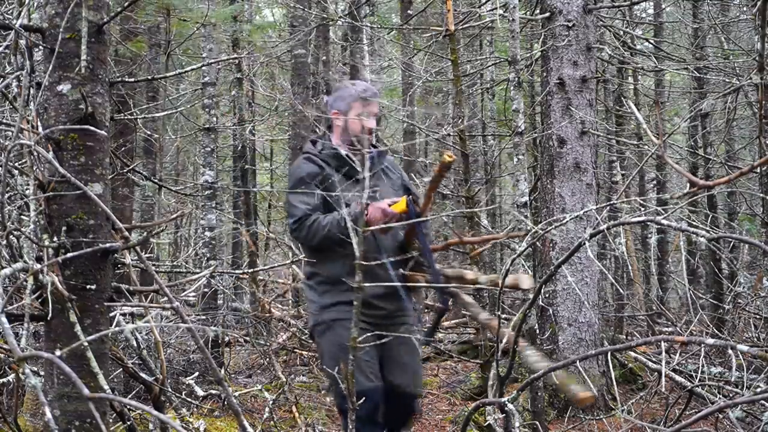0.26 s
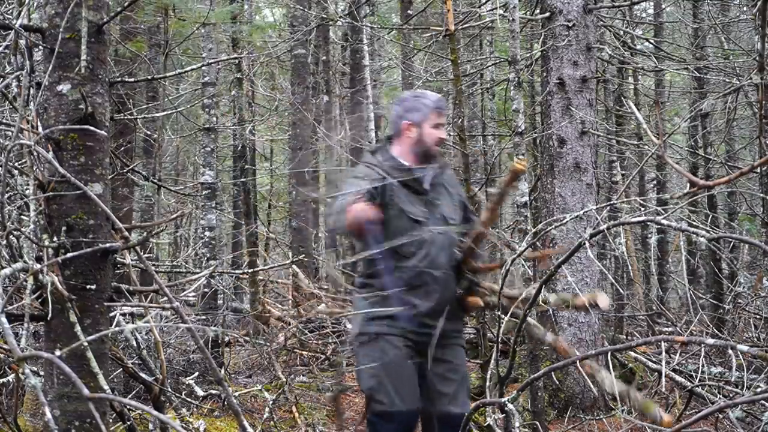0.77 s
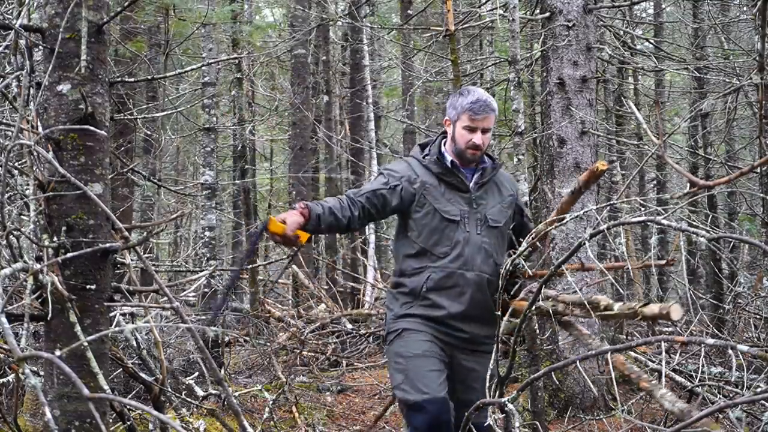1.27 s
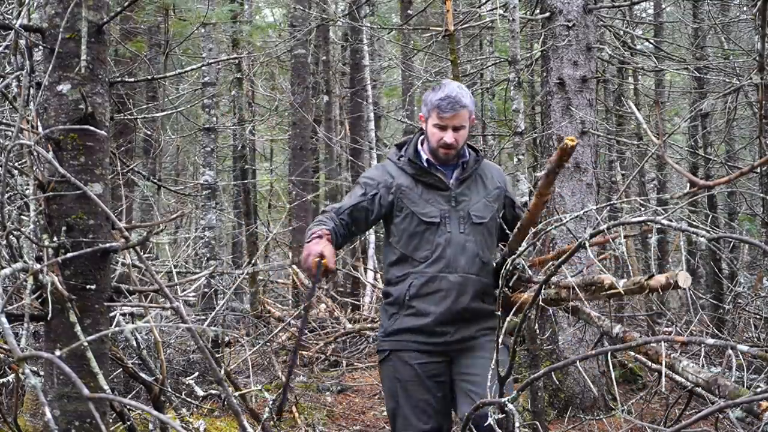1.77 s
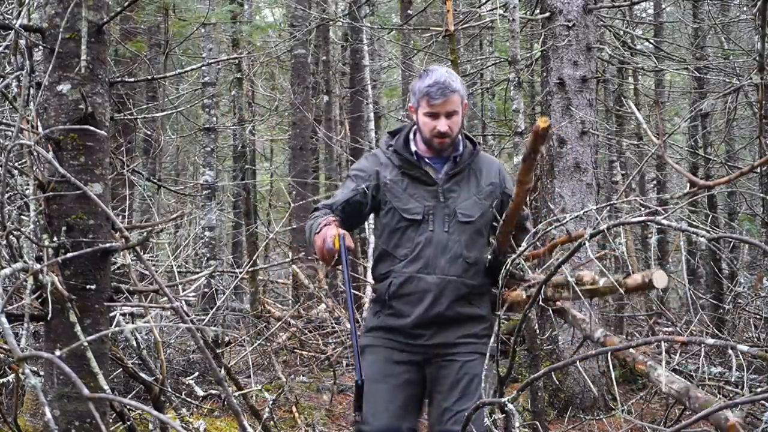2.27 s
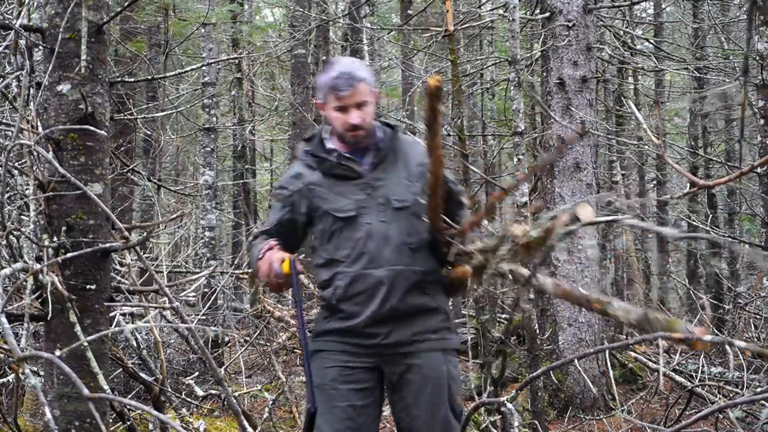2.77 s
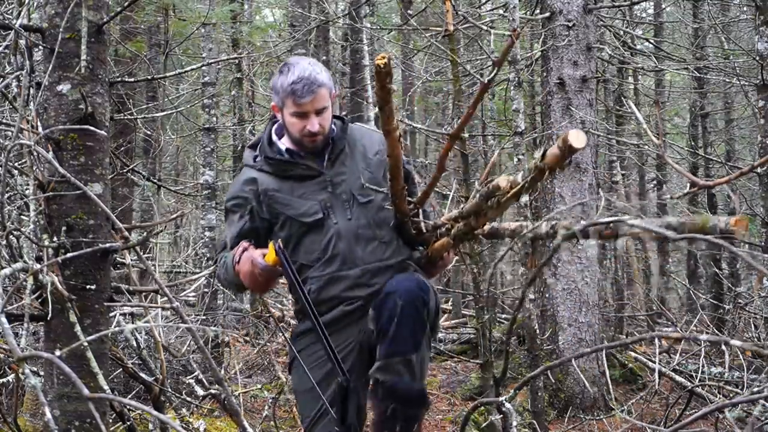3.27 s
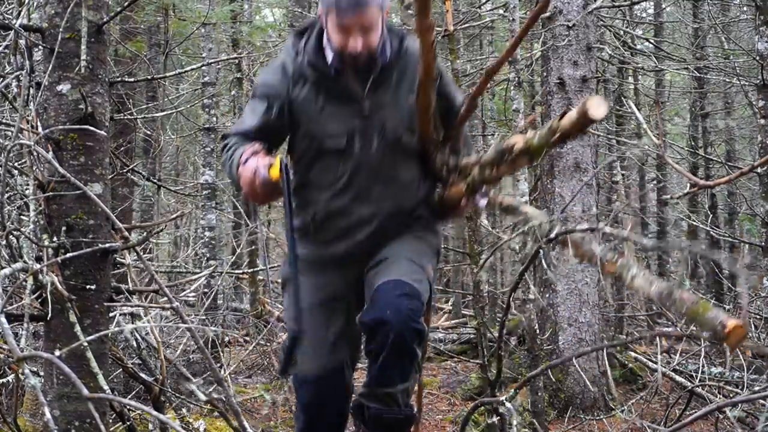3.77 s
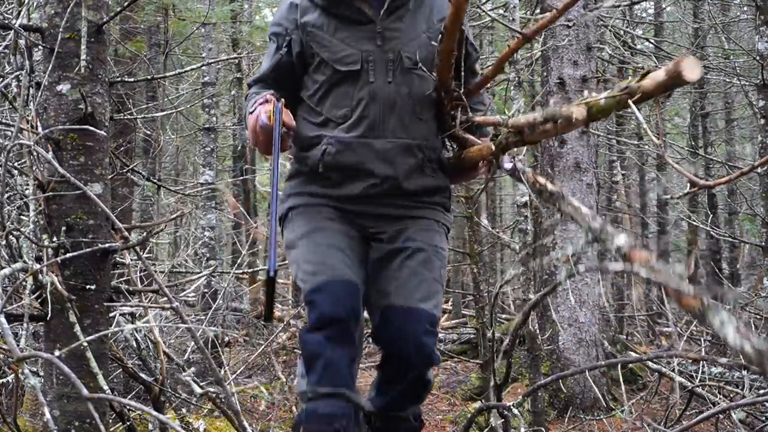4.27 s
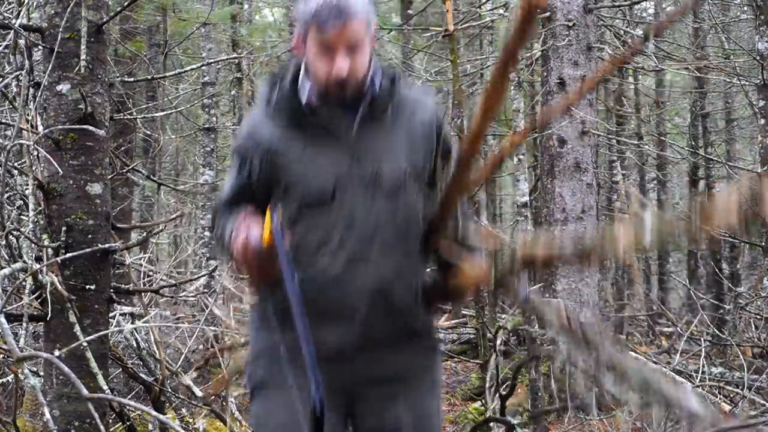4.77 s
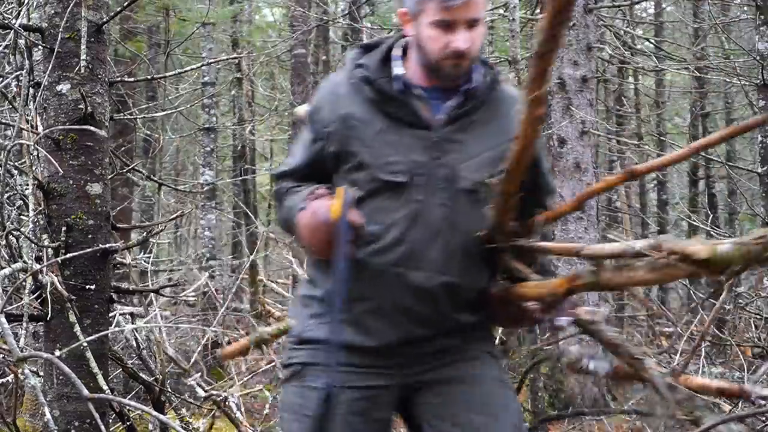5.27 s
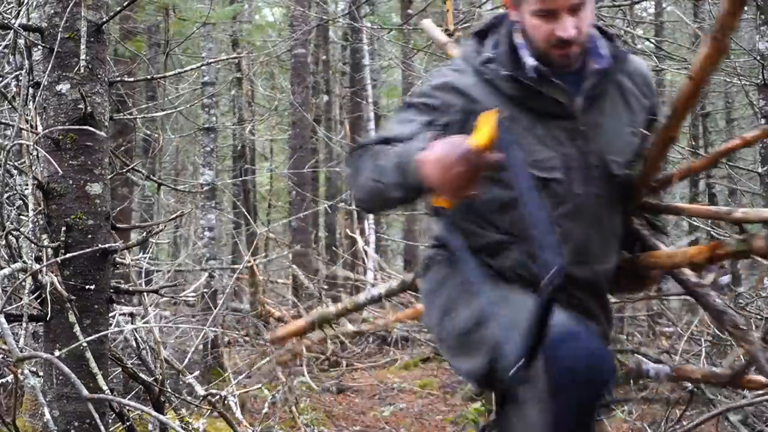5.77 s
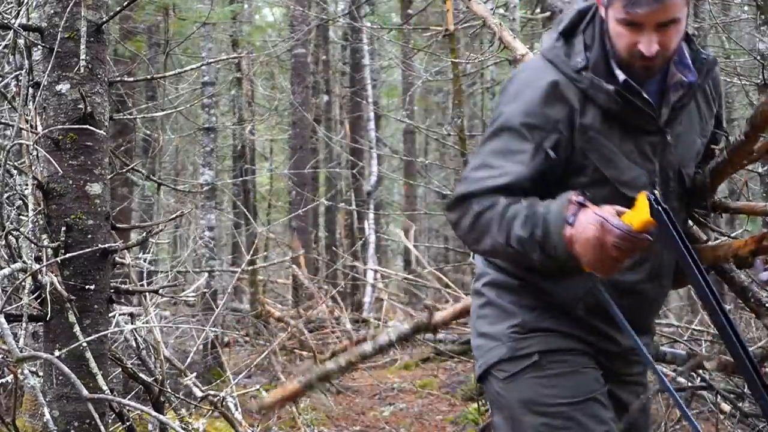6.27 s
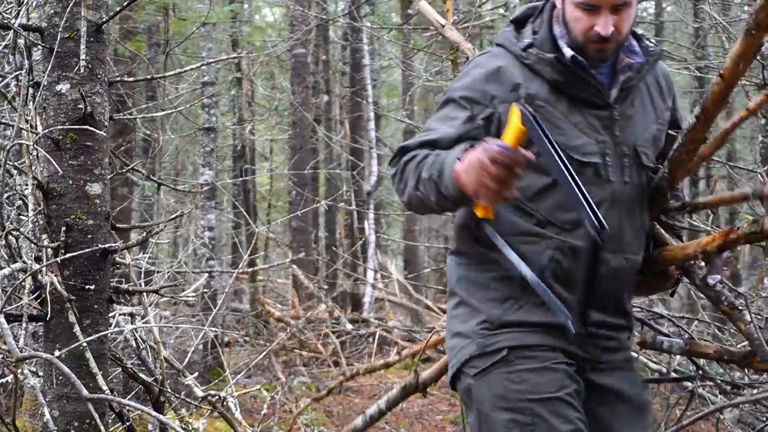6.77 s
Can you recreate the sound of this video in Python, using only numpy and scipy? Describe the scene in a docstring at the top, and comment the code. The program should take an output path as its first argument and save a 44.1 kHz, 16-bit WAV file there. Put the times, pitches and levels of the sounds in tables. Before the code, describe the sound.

Light twig snaps, soft steps and a few thin metallic taps and scrapes from a hand saw come from a little way off in quiet woods. After a swish of cloth and a brief wooden squeak, the walker is near the microphone. Brittle branches crack loudly and often, boots and carried poles knock dully in the ground litter, and twigs drag over clothes, with a short echo off the trunks.

```python
"""A man pushes through dead spruce thicket towards the microphone with branches and a bow saw.
At first dry twigs snap, and others tap and scrape the saw so that its steel modes ring.
Near 3 s his jacket swishes by friction; at 4 s wood rubs on wood with one stick-slip squeak.
From then on he is close: twigs fracture loudly, boots and poles thud and crunch in the litter,
and boughs rasp across his clothes. Throughout, the trunks scatter every sound back."""
import sys
import numpy as np
from scipy import signal
from scipy.fft import rfft, irfft
from scipy.io import wavfile
from scipy.ndimage import uniform_filter1d

SR = 44100
rng = np.random.default_rng(int(sys.argv[2]) if len(sys.argv) > 2 else 0)


def waveform_to_disk(signal):
    """Save audio, clipped to [-1, 1], as 16-bit WAV at the path in sys.argv[1]."""
    frames = np.transpose(np.atleast_2d(signal))
    scaled = np.clip(frames, -1, 1) * 32767
    samples = np.round(scaled).astype(np.int16)
    wavfile.write(sys.argv[1], SR, samples)


N = 309582
TIME = np.arange(N) / SR

# twigs breaking: (time [s], strength [dB], tilt [dB/octave], resonance [Hz],
# resonance height [dB], splinter level [dB])
SNAPS = [(.017, -27.5, 1.5, 3540, 21.5, -2), (.168, -22, -6, 1120, 11, -6.5),
         (0.225, -28, -6, 1170, 15, -2), (0.299, -25.5, -7, 1140, 12.5, -17),
         (.4977, -20, -1, 2390, 11, -3), (0.5337, -22, 2.5, 1780, 11, -17),
         (0.5731, -10.5, 3.5, 4320, 6, -3), (.833, -13.5, -6, 2920, 15.5, 1.5),
         (0.8668, -13.5, -2, 3500, 14, -8), (0.9877, -16.5, -4, 12950, 10, -10),
         (1.074, -17.5, -1.9, 7820, 15, -5.5), (1.143, -8.5, 1.8, 3350, 4.5, -9.5),
         (2.3002, -5.5, 1.3, 3780, 4, -14.5), (2.657, -14.5, -3, 10900, 18.5, -28),
         (3.119, -24.5, 3, 8510, 10, -5), (3.15, -25, 4, 2290, 14, -2.5),
         (3.3608, 3, 0.8, 6000, 11.5, -9.5), (3.516, -2, 0.2, 2420, 15, -5),
         (3.5933, -18.5, 0, 7820, 13, -2.5), (4.162, -21.5, -2.5, 2950, 9.5, -15),
         (4.2333, -20.5, 1, 3970, 7, -17), (4.324, 10, 2.5, 1670, 11.5, -13.5),
         (4.3866, 5, 4, 1780, 13.5, -13), (4.4779, 2.5, 4, 1530, 13, -16), (4.5561, -4, 4.5, 6600, 3.5, -9),
         (4.5859, -7, 1, 3980, 17.5, -30), (4.6081, 3, 1.5, 3700, 18, -11),
         (4.6391, -4.5, 8, 13000, -6, -8), (4.6479, 2, 2, 3790, 20.5, -15), (4.6524, 3, 5, 6850, 12.5, -13),
         (4.75, 0, -2.5, 3540, 5.5, -9), (4.769, -0.5, 4.5, 11400, 8.5, -5.5),
         (4.813, -1.5, -2, 1700, 5, -11), (4.8473, -0.5, 1.5, 8800, 17, -15),
         (4.8507, 3.5, -1, 2120, 12.5, -9.5), (4.893, -8.5, -1.5, 2040, 22, -3.5),
         (4.9527, -9.5, -0.5, 900, 4, -7), (5.0775, -1, 3, 3100, 18, -23), (5.1958, -4.5, 0.5, 870, 6, -12),
         (5.3479, 1, -3, 940, 7.5, -11.5), (5.3868, 0, -0.5, 5850, 5, -9.5),
         (5.4022, -8, -3.5, 6070, 9, -2.5), (5.4433, -14, -7.5, 1100, 12.5, -18),
         (5.4789, -6, -0.7, 12600, 11, -12), (5.6091, -6.5, 0.2, 13000, 4, -19),
         (5.6379, -4, -2.5, 1030, 14.5, -13), (5.669, -8.5, -2.5, 1850, 6, -4),
         (5.769, -18.5, -1, 11940, 11, -2.5), (5.8323, -3.5, -0.5, 5570, 1, -17),
         (5.8602, -8.5, 2, 1020, 6, -24), (6.039, -6.5, -3, 875, 15, -3), (6.0651, -2, 0.4, 1270, 3, -10.5),
         (6.092, -17, 4, 9000, 2, -21), (6.1211, -6, 6, 6940, 3.5, -18),
         (6.1802, -10.5, -1.5, 2570, 10.5, -16), (6.2185, -11, -3, 9800, 17.5, -11),
         (6.2717, -15.5, -6, 1030, 13, 0.5), (6.358, -14.5, 2.2, 880, 6, -10),
         (6.395, -14, 1, 700, 11, -15), (6.454, -17.5, 4, 4000, -2, -12),
         (6.5466, -8.5, -4.5, 2030, 9.5, -15), (6.604, -17, 1, 4500, 4.5, -12),
         (6.7021, -5, 4, 5300, 5.5, -12.5), (6.7347, -12.5, 4, 4910, 5.5, -12),
         (6.8036, 0.5, 3, 11200, 6, -7), (6.8093, 9.5, -2, 8800, 13, -14.5),
         (6.8283, -3, 4.5, 12000, 8, -5.5)]
# spectrum common to all breaks: (frequency [Hz], gain [dB])
SNAP_SPECTRUM = [(30, -17), (120, -4.5), (350, 0.5), (800, 0), (3500, 1.5), (6000, -0.5), (9000, 0.5),
                 (12000, -6.5), (16000, -10)]
# further shaping of the splinters: (frequency [Hz], gain [dB])
SPLINTER_SPECTRUM = [(300, -12), (1500, 11), (4000, 6.5), (8000, 8), (15000, -2.5)]
# dull knocks of boots and poles: (time [s], level [dB], pitch [Hz])
THUDS = [(0.0344, -38, 444), (0.0959, -36, 393), (.766, -31, 400), (0.8046, -35, 425), (.841, -39, 670),
         (1.0225, -34, 440), (1.1932, -37, 252), (1.3204, -28, 383), (1.487, -41, 164), (1.523, -35.5, 270),
         (1.9969, -40, 342), (2.0685, -36.5, 168), (2.303, -35, 340), (2.384, -37, 555),
         (2.6083, -33.5, 152), (3.3597, -35.5, 244), (3.669, -39, 730), (3.9903, -35, 560),
         (4.3255, -27.5, 272), (4.385, -23.5, 378), (4.479, -28, 370), (4.5357, -32.5, 243),
         (4.66, -22, 398), (4.679, -23, 390), (4.739, -23.5, 342), (4.796, -22.5, 195), (4.809, -17.5, 452),
         (5.209, -35, 358), (5.283, -26, 290), (5.3131, -16.5, 440), (5.3585, -18, 314),
         (5.3925, -15.5, 320), (5.5945, -23, 376), (5.6392, -18.5, 456), (5.701, -32, 290),
         (5.8928, -19.5, 363), (5.9277, -23.5, 114), (6.2007, -16.5, 265), (6.404, -36.5, 380),
         (6.518, -29, 310), (6.785, -21, 446), (6.8096, -17, 476), (6.8342, -24, 450), (6.8561, -23.5, 500)]
# crushed needle litter: (frequency [Hz], gain [dB])
LITTER_SPECTRUM = [(25, -16), (70, -4.5), (150, -5), (380, 1), (650, -3), (1100, -6), (2000, -14),
                   (5000, -22.5)]
# boughs dragging across clothes and springing free:
# (peak time [s], rasp level [dB], crackle level [dB], rise [s], fall [s])
BOUGHS = [(.01, -51, -59, 0.038, 0.9), (.61, -43, -49, 0.29, 0.33), (.845, -35, -47, .05, 0.067),
          (1.15, -50.5, -59.5, 0.86, 0.1), (1.27, -49, -53, 0.059, 0.1), (1.54, -55.5, -61.5, 0.36, 0.22),
          (1.85, -47, -56, 0.043, 0.05), (2.0, -56, -62, 0.2, 0.033), (2.09, -57.5, -58.5, 0.035, 0.3),
          (2.67, -59, -56, 0.079, 0.14), (3.57, -51.5, -51.5, 0.43, 0.35), (4.091, -47, -49.5, 0.15, 0.079),
          (4.55, -54, -58, 0.68, 0.12), (4.658, -51, -17, 0.017, 0.07), (4.8, -34.5, -34, 0.17, 0.22),
          (5.21, -59, -40.5, 0.049, 0.75), (5.41, -39, -59, 0.39, 0.053), (5.95, -39, -43.5, 0.14, 0.032),
          (6.06, -43, -42, 0.019, 0.099), (6.21, -43.5, -47, 0.19, 0.25), (6.45, -75, -52.5, 0.3, 0.45),
          (6.83, -41.5, -38, .09, 0.085)]
# stirring of the undergrowth, louder as the walker nears: (time [s], level [dB])
STIR = [(0, -63), (.9, -58.5), (1.5, -67), (1.85, -57.5), (2.15, -62.5), (2.55, -66.5), (2.8, -58.5),
        (3.3, -63.5), (3.7, -54), (3.9, -62), (4.28, -64), (4.7, -39.5), (5.1, -45.5), (5.7, -45),
        (6.0, -53.5), (6.35, -52.5), (6.65, -56.5), (7.02, -56.5)]
# coarse rasp of boughs: (frequency [Hz], gain [dB])
RASP_SPECTRUM = [(200, -38), (700, -0.5), (1300, 1), (2000, 1.5), (3600, 0), (5500, -6.5), (12000, -50)]
# fine crackle of twigs: (frequency [Hz], gain [dB])
CRACKLE_SPECTRUM = [(1000, 1), (3500, -5.5), (5500, -0.5), (8200, 7), (10500, -3), (14000, 1), (16000, -6)]
# twigs chattering on the saw: (time [s], level [dB])
SAW_TAPS = [(0.379, -43), (0.4, -36), (0.421, -48), (.629, -29), (0.693, -37.5), (1.19, -48), (1.913, -42)]
# twigs sliding along the saw: (peak time [s], level [dB], rise [s], fall [s])
SAW_SCRAPES = [(.62, -43, .19, 0.057), (1.15, -49.5, 0.23, 0.14), (1.48, -54.5, 0.057, .15),
               (1.69, -50, .09, .22), (1.91, -41.5, 0.25, 0.18)]
# normal modes of the saw: (frequency [Hz], level [dB], 60 dB decay time [s])
SAW_MODES = [(1906, -1, 0.32), (1948, -2, 0.091), (2150, -13.5, 0.54), (2384, -9, 0.16), (2550, -10, 0.1),
             (2980, -11, 0.046), (4215, 1.5, 0.0047)]
# wood rubbing on wood: (time [s], pitch [Hz], level [dB])
SQUEAK = [(4.057, 2325, -65), (4.063, 2160, -28), (4.066, 2285, -43), (4.07, 2260, -24.5),
          (4.077, 2070, -28), (4.077, 2080, -44), (4.101, 2120, -42)]
# jacket cloth sliding as a knee is lifted: (time [s], level [dB])
SWISH = [(2.9, -72), (3.05, -57), (3.14, -51), (3.25, -55.5), (3.35, -57.5), (3.62, -58), (3.9, -69)]
# hiss of sliding cloth: (frequency [Hz], gain [dB])
CLOTH_SPECTRUM = [(700, -22), (1800, -0.5), (4000, -3), (6000, -5), (8000, 1.5), (11000, -8), (16000, -15)]
# reverberation of the farther trunks: (frequency [Hz], 60 dB decay time [s])
WOODS_T60 = [(150, 0.46), (600, 0.093), (2000, 0.29), (5000, 0.61), (8000, 0.23), (15000, 0.68)]
# spectral weighting of the scattered sound: (frequency [Hz], gain [dB])
WOODS_SPECTRUM = [(100, 8), (500, 13), (1500, 3), (4000, 0), (8000, 5), (15000, -3.5)]
# still forest air: (frequency [Hz], gain [dB])
AIR_SPECTRUM = [(20, 3), (80, -2.5), (150, -8), (250, -9), (500, -10), (1000, -8.5), (2500, -22.5),
                (5500, -24), (8000, -39), (12000, -29), (16000, -44)]


def snaps(splinter_s=0.006, twiglet_db=-13, twiglet_s=0.033, overtone=0.093, knee_hz=700, size=8192):
    """Brittle fracture: tearing fibres excite the twig's bending modes; splinters and twiglets follow."""
    out, hz = np.zeros(N), np.fft.rfftfreq(size, 1 / SR) + 1
    lead_s = size // 16 / SR
    t = np.maximum(np.arange(size) / SR - lead_s, 0)
    settling = (t > .001) * (np.exp(-t / splinter_s) + amp(twiglet_db) * np.exp(-t / twiglet_s))
    for s, db, tilt, ring_hz, ring_db, splinter_db in SNAPS:
        fibres, splinters = rng.standard_normal((2, size))
        age = 2.8 * t / fracture_time(db, splinter_db)
        burst = rfft(fibres * age * np.exp(1 - age))
        burst /= np.sqrt(uniform_filter1d(abs(burst) ** 2, size // 32))  # a break is broadband
        # the second bending mode of a free stick lies 2.76 times above the first
        bending = resonance(hz, ring_hz) + overtone * resonance(hz, 2.76 * ring_hz)
        debris = rfft(unit(splinters * np.sqrt(abs(splinters)) * settling)) / np.sqrt(size)
        debris *= amp(splinter_db + curve(SPLINTER_SPECTRUM, hz))
        crack = burst * minimum_phase(ring_db * bending) + debris
        shape_db = curve(SNAP_SPECTRUM, hz) + tilt * np.log2(np.maximum(hz, knee_hz) / 3000)
        add(out, s - lead_s, irfft(crack * minimum_phase(db + shape_db)))
    return out


def fracture_time(db, splinter_db, base_s=0.0035, force_halving_db=17, splinter_doubling_db=11):
    """Crack growth: a strong, clean break is over at once; a weak or splintery one tears for longer."""
    return base_s * 2 ** (splinter_db / splinter_doubling_db - db / force_halving_db)


def resonance(hz, centre_hz, octaves=0.35):
    """Strong damping broadens a resonance, here into a bell shape over log frequency."""
    return np.exp(-.5 * (np.log2(hz / centre_hz) / octaves) ** 2)


def thuds(cycles=0.54, grit=0.24, crush_s=0.0068, low_cut_hz=89):
    """Damped impact: soft ground stops a knock within a few cycles; crushed litter roughens its tail."""
    out, t = np.zeros(N), np.arange(SR // 10) / SR
    for s, db, hz in THUDS:
        age = t * hz / cycles
        push = np.sqrt(age) * np.exp(1 - 1.11 * age) * np.sin(2 * np.pi * hz * t)
        crush = noise(LITTER_SPECTRUM, len(t)) * (1 - np.exp(-age)) * np.exp(-t / crush_s)
        add(out, s, amp(db) * (push + grit * crush))
    # the microphone's low cut takes the deepest bass out of the knocks
    return signal.sosfilt(signal.butter(2, low_cut_hz, "highpass", fs=SR, output="sos"), out)


def undergrowth(rasping, crackling, litter_db=-1, rasp_db=-1, crackle_db=-2):
    """Granular noise: litter crunches under the boots while twigs rasp and crackle past."""
    litter = grains(LITTER_SPECTRUM, per_s=800, spread_db=4.5, cycles=1, rub=0.19) * tread()
    rasp = grains(RASP_SPECTRUM, per_s=2800, spread_db=4.0, cycles=2.24, rub=0.71) * rasping
    crackle = grains(CRACKLE_SPECTRUM, per_s=2600, spread_db=4.5, cycles=0.6, rub=0.65) * crackling
    return amp(litter_db) * litter + amp(rasp_db) * rasp + amp(crackle_db) * crackle


def grains(spectrum, per_s, spread_db, cycles, rub, bands=28, clump_db=2.5):
    """Shot noise: tiny crushings of uneven size, each a few ragged cycles, add over a smooth rub."""
    crushings = np.zeros(N)
    clumps = amp(clump_db * unit(uniform_filter1d(rng.standard_normal(N), SR // 70)))
    for hz in np.geomspace(spectrum[1][0], min(spectrum[-2][0], 15000), bands):
        age = np.arange(int(8 * cycles / hz * SR) + 8) * hz / cycles / SR
        ragged = np.sin(2 * np.pi * cycles * age) + .4 * rng.standard_normal(len(age))
        grain = unit(age * np.exp(-age) * ragged) / np.sqrt(len(age))
        sizes = amp(spread_db * np.minimum(rng.exponential(1, N), 3))
        onsets = rng.random(N) < per_s / bands / SR
        crushings += signal.oaconvolve(sizes * onsets, grain)[:N] * np.sqrt(hz)
    return unit(clumps * (unit(colour(crushings, spectrum)) + rub * noise(spectrum)))


def tread(crunch_db=-19, lag_s=0.0073, rise_s=0.05, fall_s=0.073, stir_db=-1):
    """Loading of the litter: its gain peaks as the full weight follows each knock, over the shuffle."""
    crunches = swells((s + lag_s, db + crunch_db, rise_s, fall_s) for s, db, _ in THUDS)
    return np.hypot(crunches, amp(stir_db) * level(STIR))


def dragging(rasp_stir_db=-1, crackle_stir_db=-6):
    """Incoherent addition: boughs and stirred twigs sum in power to give the rasp and crackle gains."""
    rasp = swells((s, db, rise, fall) for s, db, _, rise, fall in BOUGHS)
    crackle = swells((s, db, rise, fall) for s, _, db, rise, fall in BOUGHS)
    stir = level(STIR)
    return np.hypot(rasp, amp(rasp_stir_db) * stir), np.hypot(crackle, amp(crackle_stir_db) * stir)


def ticks(crackling, per_s=45, tick_db=-7):
    """A short impulse is broadband: hair-thin twig ends flick off, each with one bare click."""
    click = irfft(minimum_phase(curve(CRACKLE_SPECTRUM, np.fft.rfftfreq(512, 1 / SR)) / 2))
    clicks = signal.oaconvolve(impulses(per_s), click)[:N]
    return amp(tick_db) * unit(clicks) * crackling


def saw(tap_db=-2, scrape_db=-2, chatter_s=0.003, contact_s=0.016):
    """Modal excitation: chattering taps and stick-slip scraping ring the same steel modes."""
    t, taps = np.arange(SR // 3) / SR, np.zeros(N)
    for s, db in SAW_TAPS:
        ring = steel(t, db_per_octave=0.5) * np.exp(-t / contact_s)  # the resting twig damps the steel
        chatter = rng.standard_normal(len(t)) * t * np.exp(-t / chatter_s)
        tap = signal.oaconvolve(chatter, ring)
        add(taps, s, amp(db + tap_db) * tap / tap[:SR // 50].std())
    scrape = signal.oaconvolve(impulses(per_s=700), steel(t, db_per_octave=-5))[:N]
    return taps + amp(scrape_db) * swells(SAW_SCRAPES) * unit(scrape)


def steel(t, db_per_octave):
    """Free vibration is a sum of decaying modes; a soft contact leaves the upper ones weaker."""
    ring, lowest_hz = np.zeros(len(t)), SAW_MODES[0][0]
    for hz, db, t60 in SAW_MODES:
        envelope = amp(db + db_per_octave * np.log2(hz / lowest_hz) - 60 * t / t60)
        ring += envelope * np.sin(2 * np.pi * (hz * t + rng.random()))
    return ring


def squeak(overtone_db=-25):
    """Stick-slip oscillation: wood on wood gives a short tone that wavers and falls."""
    s, hz, _ = np.transpose(SQUEAK)
    phase = 2 * np.pi * np.cumsum(np.interp(TIME, s, hz)) / SR
    return level(SQUEAK, column=2) * (np.sin(phase) + amp(overtone_db) * np.sin(2 * phase))


def jacket(reflection=0.26, delay_s=.0011):
    """Comb filtering: the hiss of sliding cloth interferes with its reflection from the ground."""
    hiss = noise(CLOTH_SPECTRUM)
    return level(SWISH) * unit(hiss + reflection * np.roll(hiss, round(delay_s * SR)))


def woods(direct, spots=5, spots_per_s=17):
    """Scattering depends on source position: the sound cycles through the echoes of several spots."""
    position, scattered = TIME * spots_per_s % spots, np.zeros(N)
    for spot in range(spots):
        distance = abs((position - spot + 1) % spots - 1)
        share = np.cos(np.pi / 2 * np.minimum(distance, 1))  # equal-power crossfade
        scattered += signal.oaconvolve(direct * share, echoes())[:N]
    return direct + colour(scattered, WOODS_SPECTRUM)


def echoes(near_db=-15, near_s=0.0032, far_db=-18):
    """Impulse response: ground and nearby stems reflect at once; farther trunks give a thin tail."""
    t = np.arange(SR // 2) / SR
    near, far = rng.standard_normal((2, len(t))) * (t > .002)
    near *= np.exp(-t / near_s)
    hz, delay_s, bands = signal.stft(far, SR, nperseg=256)
    decay = amp(-60 * delay_s / curve(WOODS_T60, hz)[:, None])
    far = signal.istft(bands * decay, SR, nperseg=256)[1][:len(t)]
    return amp(near_db) * near / np.linalg.norm(near) + amp(far_db) * far / np.linalg.norm(far)


def forest_air(db=-61):
    """Stationary noise: the faint, low hush of the still forest."""
    return amp(db) * noise(AIR_SPECTRUM)


def amp(db):
    """Amplitude ratio of a level in decibels."""
    return 10 ** (np.asarray(db) / 20)


def unit(x):
    """Normalisation to an rms of 1."""
    return x / np.sqrt(np.mean(x ** 2) + 1e-20)


def add(mix, s, sound):
    """Superposition of a sound on the mix at time s."""
    part = mix[max(round(s * SR), 0):][:len(sound)]
    part += sound[:len(part)]


def curve(points, hz):
    """Linear interpolation over log frequency."""
    point_hz, value = np.transpose(points)
    return np.interp(np.log(hz + 1), np.log(point_hz + 1), value)


def colour(x, spectrum):
    """Zero-phase filtering by a spectrum."""
    return irfft(rfft(x) * amp(curve(spectrum, np.fft.rfftfreq(len(x), 1 / SR))), len(x))


def noise(spectrum, size=N):
    """Filtered Gaussian noise with an rms of 1."""
    return unit(colour(rng.standard_normal(size), spectrum))


def impulses(per_s):
    """A Poisson process: independent impulses of random size."""
    return rng.standard_normal(N) * (rng.random(N) < per_s / SR)


def minimum_phase(db):
    """Causality: the response with this gain rings after the blow, never before."""
    log_gain = np.log(amp(np.concatenate([db, db[-2:0:-1]])))
    return np.exp(np.conj(signal.hilbert(log_gain)))[:len(db)]


def level(rows, column=1):
    """Amplitude envelope from a dB column, silent outside its span."""
    rows = np.array(rows)
    return amp(np.interp(TIME, rows[:, 0], rows[:, column], left=-120, right=-120))


def swells(rows, depth_db=20):
    """Envelope of strokes adding in power; each climbs and sinks by depth_db in its rise and fall."""
    power = np.zeros(N)
    for s, db, rise_s, fall_s in rows:
        t = np.arange(-min(3 * rise_s, s), 3 * fall_s, 1 / SR)
        add(power, s + t[0], amp(db - depth_db * np.maximum(-t / rise_s, t / fall_s)) ** 2)
    return np.sqrt(power)


def scene():
    """Superposition: direct sound, echoes and forest air add at one microphone."""
    air = forest_air()
    rasping, crackling = dragging()
    direct = snaps() + thuds() + saw() + squeak()
    direct += undergrowth(rasping, crackling) + ticks(crackling) + jacket()
    mono = woods(direct) + air
    return np.array([mono, mono])


def record(dry, cutoff_hz=16050):
    """Clipping and band limiting: peaks are held to full scale, then low-pass filtered."""
    low_pass = signal.firwin(511, cutoff_hz, window=("kaiser", 9), fs=SR)
    return signal.oaconvolve(np.clip(dry, -1, 1), low_pass[None], "same")


dry = scene()
out = record(dry)
waveform_to_disk(out)
```